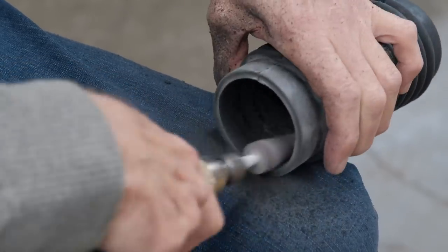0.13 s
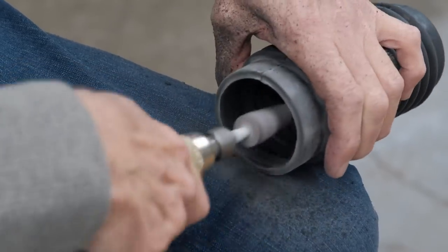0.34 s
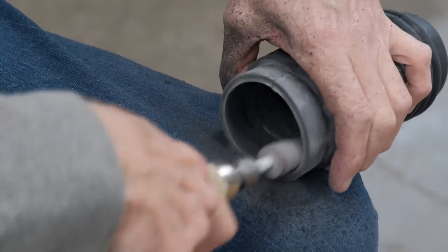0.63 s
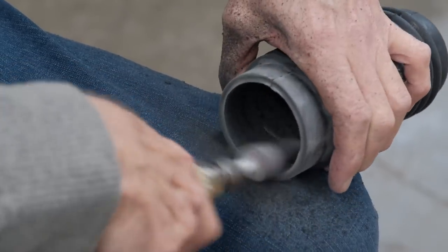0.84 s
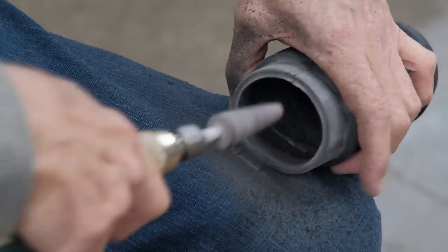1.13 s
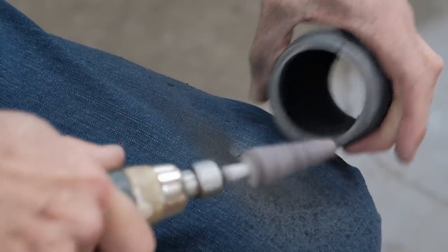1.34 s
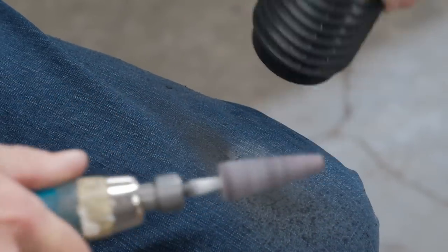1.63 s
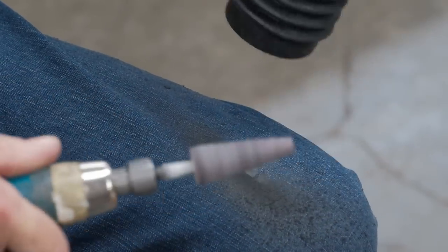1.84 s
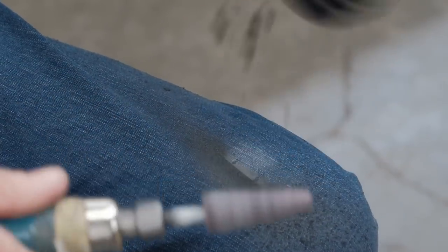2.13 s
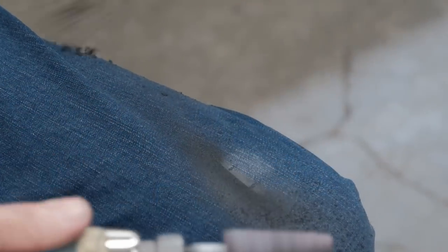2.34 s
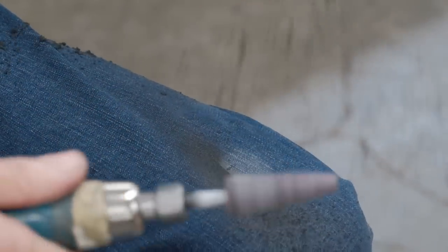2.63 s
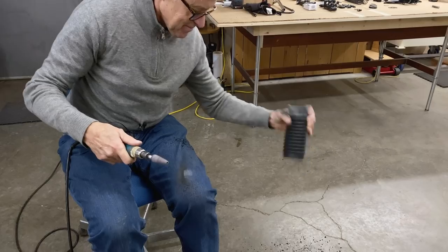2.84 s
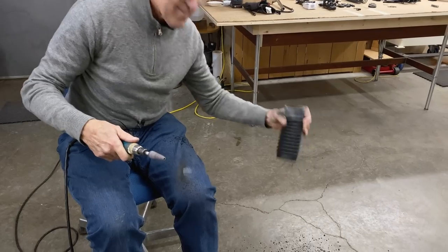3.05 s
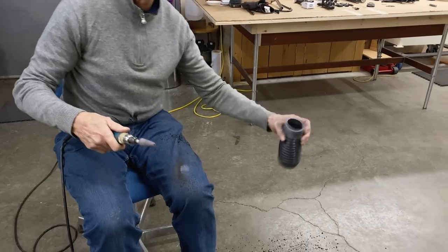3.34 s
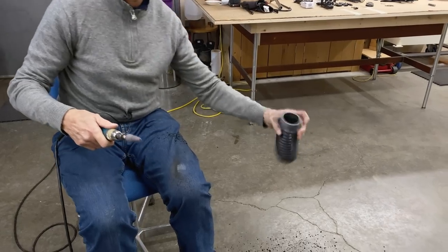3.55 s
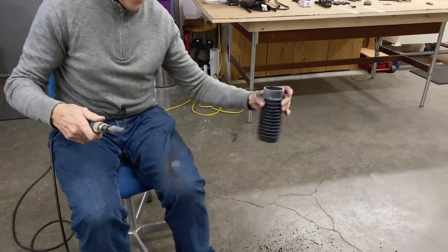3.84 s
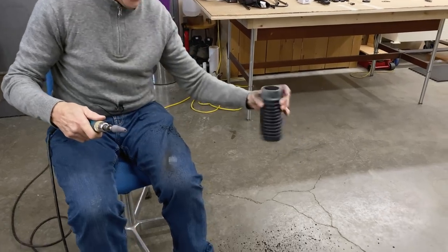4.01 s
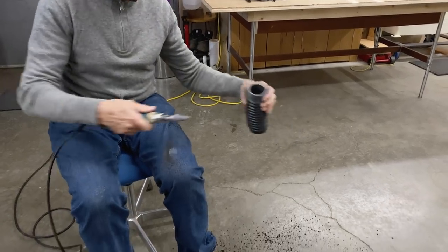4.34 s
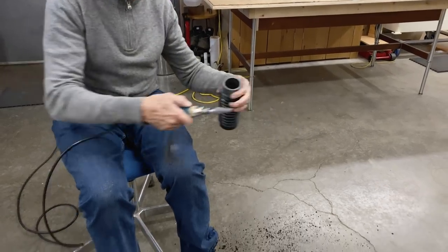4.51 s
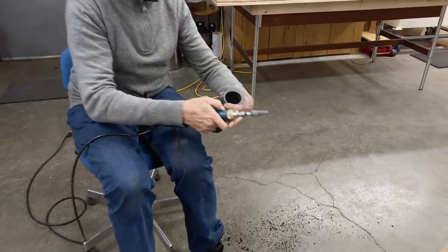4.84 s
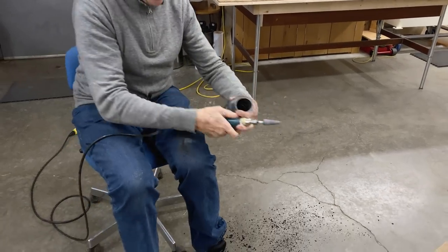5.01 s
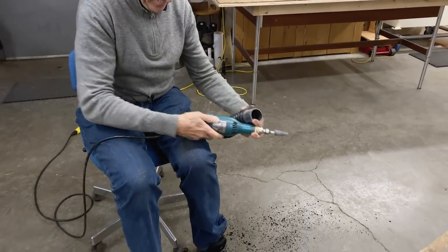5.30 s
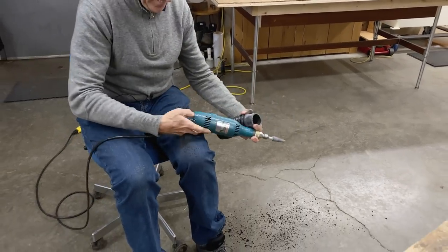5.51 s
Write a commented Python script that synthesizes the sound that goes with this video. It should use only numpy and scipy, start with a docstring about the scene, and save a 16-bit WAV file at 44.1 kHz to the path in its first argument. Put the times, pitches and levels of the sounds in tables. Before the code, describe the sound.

An electric die grinder whines and roars, its pitch wobbling as it sands inside a rubber hose, then spins up freely and runs at full speed.

```python
"""An electric die grinder first sands the inside of a rubber hose, its speed sagging at each bite until 1.1 s.
Pulled out, it spins up freely; from 2.75 s it runs at full speed and is swung in, raised and tipped away.
Throughout, shaft, armature and ball bearing sing as sines locked to the rotation, with a faint workshop echo,
over the cooling fan's roar, which is noise shaped in short-time spectra. All change as the hand turns the tool.
Short cross-fades join the three stretches; both channels match but for noise in set bands and moments."""
import sys
import numpy as np
from scipy import signal
from scipy.io import wavfile
from scipy.ndimage import uniform_filter1d

SR = 44100
rng = np.random.default_rng(int(sys.argv[2]) if len(sys.argv) > 2 else 0)


def inscribe(sig):
    """Save sig as 16-bit PCM at rate SR to the path in sys.argv[1].

    A 1-D sig is mono; a 2-D sig holds one channel per row.
    Samples are clipped to [-1, 1] before scaling.
    """
    pcm = np.round(np.clip(np.atleast_2d(sig).T, -1, 1) * 32767)
    wavfile.write(sys.argv[1], SR, pcm.astype(np.int16))


N = 250029
T = np.arange(N) / SR
JOINS_S, FADE_S = (1.118, 2.752), (.008, .0025)  # where the three stretches meet, and their cross-fades

# orders are multiples of the shaft speed
BALL = 2.5747  # ball passes a turn
UNBALANCE, ARMATURE, THIRD, FIFTH, EIGHTH, SLOTS = 1, 2, 3, 5, 8, 12
BARS, LOAD_DB = 24, 4  # commutator bars a turn; gain of their whine at full pressure, as motor current grows
HUM_ORDERS = (UNBALANCE, ARMATURE, BALL)  # the three strongest lines
# orders of the upper lines, which change as the vents face the microphone or turn away
LOUD_ORDERS = (3, BALL + 1, 4, 2 * BALL - 1, BALL + 2, 5, 6, 2 * BALL + 1, 7, 3 * BALL, 8, 12, 16, 24, 25)
# orders of the faint lines that come and go
FAINT_ORDERS = (BALL / 7, 4 - BALL, 2.265, 2 * BALL, BALL + 3, 2 * BALL + 2, 10, 11, 3 * BALL + 4, 13, 15,
                19, 21, 23, 26, 27, 28, 29, 31, 35)
FLUTTER_DB = (.4, .6)  # rms tremble of a line without pressure, and that added at full pressure
SLIPS = (.25, .75)  # turns by which the second and third stretch are out of step with the first
# pressure of the sanding cone on the rubber: t/s, pressure (0-1)
PRESSURE = [(0, 1.), (1.09, 1.), (1.13, 0.05), (5.67, 0.14)]
# brief flares and dropouts of single lines: t/s, Gaussian half length/s, order, lift/dB
FLARES = [(0.275, .014, UNBALANCE, -6), (.33, 0.016, THIRD, 5), (1.095, 0.015, UNBALANCE, 7.5),
          (1.088, .02, THIRD, 4), (.03, .05, SLOTS, 5), (2.06, 0.048, EIGHTH, 2), (2.66, 0.052, SLOTS, -6),
          (2.69, 0.039, EIGHTH, -12), (3.269, 0.073, FIFTH, 10.5), (4.35, .05, SLOTS, 15.5),
          (4.36, 0.051, BALL, -14), (4.46, 0.016, ARMATURE, -1.5), (3.9, 0.024, BALL, -1),
          (4.64, .05, UNBALANCE, 0), (5.25, 0.047, FIFTH, 4.5)]


def motor():
    """Order lines: each part's tone keeps a fixed ratio to the rotation; the snatching cone adds tremble."""
    pressure, speed_hz = columns(PRESSURE, T)[0], shaft()
    jitter = (0.0002 + 0.0015 * pressure) * wander(60., T)
    turns = np.cumsum(speed_hz * (1 + jitter)) / SR
    shares = [np.clip((T - s) / fade_s + .5, 0, 1) for s, fade_s in zip(JOINS_S, FADE_S)]
    levels_db = hum_levels(speed_hz, shares[0]) + whine_levels() + faint_levels(pressure, shares[1])
    out = np.zeros(N)
    for order, db in zip(HUM_ORDERS + LOUD_ORDERS + FAINT_ORDERS, levels_db):
        for s, half_s, flared_order, lift_db in FLARES:
            if flared_order == order:
                db = db + lift_db * np.exp(-.5 * ((T - s) / half_s) ** 2)
        flutter_db = (FLUTTER_DB[0] + FLUTTER_DB[1] * pressure) * wander(50., T)
        load_db = (order == BARS) * LOAD_DB * pressure
        start = rng.random()
        first, second, third = (np.sin(2 * np.pi * (order * (turns + slip) + start)) for slip in (0,) + SLIPS)
        line = first + shares[0] * (second - first) + shares[1] * (third - second)
        out += np.sqrt(2) * gain_of(db + flutter_db + load_db) * line  # sqrt(2): levels are rms
    return out


# the speed under load sags at each bite and recovers: t/s, shaft speed f/Hz
GRINDING = [(0.01, 378), (0.062, 375.7), (0.083, 365.5), (0.173, 385.5), (0.248, 351.0), (0.298, 367.2),
            (0.346, 360.3), (0.4, 385.1), (0.427, 386.6), (0.464, 374.6), (0.513, 388.7), (0.563, 381.3),
            (0.647, 401.5), (0.69, 385.2), (0.758, 400.8), (0.801, 388.1), (0.856, 394.4), (0.913, 383.8),
            (0.942, 395.8), (0.976, 388.4), (1.015, 396.0), (1.074, 377.5), (1.11, 382.2)]
FREED_HZ, GOAL_HZ, SPIN_UP_S = 385.85, 447.3, .93  # freed, it closes on its goal; time constant
FULL_HZ, CREEP_FROM_S = 443.4, 3.85  # full speed, and when it begins to creep up
CREEP_HZ, CREEP_POWER = 3.0, 1.5  # creep after one second, and its power of time


def shaft():
    """Rotor inertia: speed in Hz, loaded, then rising exponentially, then full, with every change rounded."""
    rising = GOAL_HZ - (GOAL_HZ - FREED_HZ) * np.exp(-(T - JOINS_S[0]) / SPIN_UP_S)
    full = FULL_HZ + CREEP_HZ * np.maximum(T - CREEP_FROM_S, 0) ** CREEP_POWER
    loaded = columns(GRINDING, T)[0]
    hz = np.select([T < JOINS_S[0], T < JOINS_S[1]], [loaded, rising], full)
    return uniform_filter1d(hz, size=800)


LOCAL_MEAN_S = 0.1


def surge(t):
    """Speed fluctuation: Hz by which the loaded speed exceeds its mean over the moments around it."""
    speed_hz = shaft()
    loaded = np.clip((JOINS_S[0] - T) / FADE_S[0], 0, 1)
    excess_hz = speed_hz - uniform_filter1d(speed_hz, round(LOCAL_MEAN_S * SR))
    return np.interp(t, T, loaded * excess_hz)


# base levels of the three strongest lines: t/s, unbalance level/dB, armature hum level/dB, ball pass level/dB
HUM = [(0, -41, -31, -42), (.2, -39, -31, -38), (.4, -42.5, -30.5, -40.5), (.75, -38, -28.5, -33),
       (1.11, -43, -30.5, -38.5), (1.14, -46, -28, -37), (1.5, -42.5, -30, -38), (1.65, -40, -25.5, -35),
       (1.91, -38, -26, -32.5), (2.25, -41, -28, -36.5), (2.48, -40.5, -27, -33.5),
       (2.745, -40.5, -29, -36), (2.76, -36.5, -26.5, -35), (3.2, -36, -27, -35.5),
       (3.36, -37, -29.5, -37.5), (3.7, -38, -30, -36.5), (4.07, -37.5, -29.5, -37.5),
       (4.27, -35.5, -27, -43), (4.5, -49, -33.5, -46.5), (4.79, -49, -31, -37), (5.04, -41, -32.5, -39.5),
       (5.13, -45.5, -31.5, -37), (5.2, -56, -35, -44), (5.3, -52.5, -42, -50), (5.67, -54, -40.5, -50)]
SURGE_DB, BRAKING_DB = (.02, 0.33, -0.04), (0.5, 0.2, -0.1)  # gain per Hz of surge, per 100 Hz/s of braking


def hum_levels(speed_hz, freed):
    """Load modulation: unbalance, armature hum and ball pass follow the surges and braking of the shaft."""
    above = surge(T)
    slowing = -uniform_filter1d(np.gradient(speed_hz) * SR / 100, size=900)
    braking = (1 - freed) * slowing
    return [db + a * above + b * braking for db, a, b in zip(columns(HUM, T), SURGE_DB, BRAKING_DB)]


# base level/dB: one column for each of LOUD_ORDERS, one row for each pose
WHINE_DB = [(-38, -58, -49, -55, -54, -54, -62, -56, -56, -57, -49.5, -54.5, -66, -58, -63),
            (-43.5, -65, -52, -57, -54, -62, -58, -50, -58, -51, -46, -48.5, -60, -57, -65),
            (-42, -56, -57, -56, -52.5, -59, -49, -49.5, -52, -50, -47.5, -44.5, -53, -52, -65),
            (-56, -48, -51, -51, -46.5, -55, -53, -41, -58, -46, -40.5, -46.5, -60, -55, -63),
            (-54, -45.5, -58, -46, -47.5, -55, -46, -42.5, -57, -52, -46, -56, -61, -64, -68),
            (-54, -51, -58, -46.5, -53, -57, -56, -47, -49, -57, -44, -47.5, -55, -55.5, -54),
            (-64, -51.5, -55.5, -47, -48.5, -53.5, -55, -48, -49, -62, -46.5, -50.5, -52, -56, -54),
            (-43, -56, -51, -48.5, -66, -46, -66, -58, -61, -61, -64, -45.5, -53, -67, -72),
            (-50, -52, -55, -48.5, -65.5, -45, -50, -54, -64, -53, -69.5, -53, -59, -69, -69),
            (-52, -55, -59, -46, -62, -45.5, -59, -53, -58, -57, -71, -54, -64, -65, -74)]


def whine_levels():
    """Directivity: each upper line has its own level in each pose of the tool, and drifts by 1.5 dB rms."""
    return [db + 1.5 * wander(4., T) for db in posed(WHINE_DB, T)]


# base level/dB of each of FAINT_ORDERS, while the tool grinds and spins up
RISING_DB = (-74, -64, -47, -54, -54, -55, -50, -57, -55, -58, -56, -61, -59, -58, -69, -66, -70, -68, -74,
             -76)
# base level/dB of each of FAINT_ORDERS, at full speed
STEADY_DB = (-71, -61, -50, -55, -54, -61, -57, -57, -58, -60, -58, -54, -57, -64, -70, -62, -64, -76, -67,
             -77)
# tilt of the faint lines, negative as the vents turn away: t/s, level/dB added for every ten orders
AWAY = [(0, -.1), (1.5, -.1), (2.74, -1.5), (2.76, .1), (4.3, -.2), (4.5, -2.5), (5.67, -3.5)]


def faint_levels(pressure, at_full_speed):
    """Shadowing: faint lines follow the blade hiss, are muffled by the hose, and tilt as the vents turn."""
    facing_db = columns(HISS, T)[0] + 30 - 6.5 * pressure
    away_db = columns(AWAY, T)[0]
    levels_db = []
    for order, rising_db, steady_db in zip(FAINT_ORDERS, RISING_DB, STEADY_DB):
        base_db = rising_db + at_full_speed * (steady_db - rising_db)
        sway_db = 2.5 * wander(2.565, T)
        levels_db.append(base_db + facing_db + order / 10 * away_db + sway_db)
    return levels_db


# how the tool is held: deep in the hose, at its rim, pulled out, lowered, rested, far off, arm back,
# swung in, raised, tipped away: t/s of the start, glide/s
POSES = [(0, .01), (.53, .1), (1.118, .01), (1.53, 0.24), (2.15, 0.21), (2.752, .01), (3.3, 0.23),
         (4.4, 0.32), (4.95, 0.17), (5.24, 0.19)]


def posed(rows, t):
    """Interpolation: one row for each pose becomes one curve for each column, gliding from pose to pose."""
    knots = np.ravel([(s - glide / 2, s + glide / 2) for s, glide in POSES])[1:]
    return [np.interp(t, knots, np.repeat(c, 2)[:-1]) for c in np.transpose(rows)]


# blade hiss, which scales the whole roar: t/s, relative level/dB
HISS = [(0, -32), (.5, -33), (1.1, -31.5), (1.2, -30), (1.49, -31.5), (1.88, -28.5), (2.2, -31),
        (2.65, -30.5), (3.3, -29.5), (3.7, -29.5), (4.05, -30), (4.22, -29), (4.52, -30), (4.77, -28.5),
        (4.99, -31.5), (5.12, -30), (5.4, -33), (5.67, -33)]


def fan():
    """Turbulence noise: random short-time spectra take the air's colour; set patches differ left from right."""
    frames, hz = N // 128 + 5, np.fft.rfftfreq(512, 1 / SR)[:, None]
    t = np.arange(frames) * 128 / SR
    a, b, c, d, patches = rng.standard_normal((frames, 257, 5)).T
    patches = uniform_filter1d(patches, size=7, axis=0)
    patches = evened(uniform_filter1d(patches, size=40, axis=1))
    field_db = air_colour(hz, t) + 0.93 * patches + passing_shapes(hz, t) + gusts(hz, t) + top_flicker(hz, t)
    spread = spread_share(hz, t)
    middle = np.sqrt(1 - spread) * (a + 1j * b)
    sides = np.sqrt(spread) * (c + 1j * d)
    left_right = np.array([middle + sides, middle - sides])
    noise = signal.istft(left_right * gain_of(field_db), nperseg=512, noverlap=384)[1]
    return gain_of(-23.5) * noise[:, :N]


# colour of the cooling air: f/Hz, relative level/dB per Hz
AIR = [(25, -41), (70, -54), (160, -8.5), (330, -2.5), (520, -5), (720, 8), (1000, 13), (1400, 5),
       (2000, 1.5), (3000, 4), (4200, 1), (5500, 1.5), (7500, 4), (10000, -5), (13000, -14), (15600, -24)]
# parts that beam differently (housing, intake, outlet, slots, blades, brushes): f/Hz, bell width/octaves
PARTS = [(300, 0.87), (1000, 1), (2000, 0.65), (3100, 0.25), (4600, 0.31), (12500, 0.55)]
# lift/dB: one column for each of PARTS, one row for each pose
LIFTS_DB = [(0, 1.1, -2.5, 3, -1.5, 2), (-1, 2, -3, 3, -0.9, 1.8), (-1.5, -1, -1, 3.5, -3, 1.5),
            (-1.5, -1, 0.5, 2, -1.5, 1.5), (-1.5, 0, 1, -1.5, -1, 3), (-2.5, 2, -4, 3.5, -1, 2),
            (-2, -3, 0, -1, -1.1, 1), (2.5, -5.5, 3.5, -2.5, -1, -2.5), (3, -4.5, 6, -2, 1, 1),
            (-2.5, -7.5, 6.5, -1, -1.5, -1.5)]


def air_colour(hz, t):
    """Directivity of broadband sources: the air's spectrum plus the bell of each part, lifted by pose."""
    field_db = read(AIR, hz) + columns(HISS, t)[0]
    for (centre_hz, octaves), lift_db in zip(PARTS, posed(LIFTS_DB, t)):
        field_db += bump(hz, centre_hz, octaves) * lift_db
    return field_db


# swells and dips as a vent sweeps past, and a brief broad dip at 1.1 s: t/s, Gaussian half length/s, f/Hz, bell
# width/octaves, lift/dB
SWELLS = [(.45, 0.06, 3700, .1, -2), (.9, 0.077, 2000, .15, -4), (1.1, .012, 4300, .6, -3),
          (1.17, .04, 3020, 0.28, 3.5), (1.2, 0.1, 7700, .15, 2), (1.797, 0.082, 1450, .2, 3),
          (1.95, 0.39, 6200, 0.048, 5), (2.425, 0.071, 1530, 0.33, 2.5), (2.445, 0.14, 4430, .08, 7.5),
          (2.858, 0.065, 2020, 0.17, -4), (3.55, .1, 1980, 0.063, 8), (4.213, 0.069, 5950, .15, 6.5),
          (4.25, .06, 3200, 0.24, 2.5), (4.32, 0.17, 12600, 0.13, 6), (4.55, .1, 1900, .2, -3),
          (4.7, .35, 190, .5, 2), (4.776, 0.11, 1310, 0.22, 6), (4.79, 0.065, 7600, 0.19, 4),
          (4.952, 0.033, 3000, .2, -3), (5.452, .18, 3130, 0.083, 8)]
# a hollow sliding up as the arm swings in, like a floor echo cancelling: t/s, f/Hz, lift/dB
HOLLOW = [(4.22, 1690, -7), (4.3, 1900, -10), (4.45, 2620, -6), (4.6, 3100, -10), (4.75, 3280, -4.5)]
# a crest sliding through the roar as the tool tips over: t/s, f/Hz, lift/dB
CREST = [(5.0, 2300, 0.1), (5.06, 2450, 5), (5.12, 2850, 5), (5.19, 3200, 6), (5.3, 3150, 3.5),
         (5.4, 3100, 1), (5.67, 3100, 2)]


def passing_shapes(hz, t):
    """Time-varying filtering: brief swells, a sliding hollow and a sliding crest, in dB."""
    shape_db = 0
    for s, half_s, centre_hz, octaves, lift_db in SWELLS:
        shape_db = shape_db + bump(hz, centre_hz, octaves) * lift_db * np.exp(-.5 * ((t - s) / half_s) ** 2)
    for rows, octaves in ((HOLLOW, .1), (CREST, .13)):
        centre_hz, lift_db = columns(rows, t)
        shape_db += bump(hz, centre_hz, octaves) * lift_db
    return shape_db


def gusts(hz, t):
    """Amplitude modulation: the air follows speed surges and wavers at random, in dB."""
    surge_db = read([(1500, .01), (6000, .05), (13000, .12)], hz) * surge(t)
    treble_db = read([(6000, 0.11), (13000, 0.94)], hz) * wander(12., t, step=1)
    quick_db = read([(800, 0.56), (3000, 0.77), (12000, 0.31)], hz) * wander(60., t, step=1)
    return surge_db + treble_db + quick_db


def top_flicker(hz, t):
    """Periodic modulation: a steady 47.5 Hz flicker is laid over the topmost hiss, in dB."""
    return read([(5000, .1), (8000, 0.54), (13000, 1.8)], hz) * np.sin(2 * np.pi * 47.5 * t)


# set bands and moments where noise differs left from right: from t/s, to t/s, low f/Hz, high f/Hz, share (0-1)
SPREADS = [(0, .12, 3400, 4600, 0.4), (0.1, 0.327, 3500, 5160, 0.74), (0.3, 0.41, 3500, 4520, 0.8),
           (0.356, 0.544, 3230, 4260, 0.56), (1.086, 1.12, 300, 15700, 0.6)]


def spread_share(hz, t):
    """Decorrelation: the share of noise power, by band and moment, that is opposite in the two channels."""
    spread = np.zeros((len(hz), len(t)))
    for start, end, low_hz, high_hz, share in SPREADS:
        inside = (t > start) * (t < end) * (hz > low_hz) * (hz < high_hz)
        spread = np.maximum(spread, np.clip(share, 0, 1) * inside)
    return spread


# decay of the workshop: f/Hz, time to fall by 60 dB t/s
SHOP = [(200, 0.55), (1000, 0.37), (4000, 0.5), (12000, 0.077)]


def shop(x):
    """Reverberation: sparse taps of random sign, each band decaying exponentially at its own rate."""
    taps = np.zeros(SR)
    at = np.arange(400, SR - 22, 22)
    taps[at + rng.integers(0, 22, at.shape)] = rng.choice([-1., 1.], at.shape)
    hz, t, z = signal.stft(taps, SR, nperseg=256)
    t60_s = np.maximum(read(SHOP, hz), .05)[:, None]
    tail = signal.istft(z * gain_of(-60 * t / t60_s), SR, nperseg=256)[1]
    return signal.fftconvolve(x, tail / np.linalg.norm(tail))[:N]


def gain_of(db):
    """Logarithmic level: decibels to an amplitude factor."""
    return 10 ** (np.asarray(db) / 20)


def evened(x):
    """Normalization: scales to rms 1."""
    return x / np.sqrt(np.mean(x ** 2) + 1e-20)


def read(points, hz):
    """Interpolation: reads a spectrum on a log-frequency axis."""
    f, value = np.transpose(points)
    return np.interp(np.log(hz + 1), np.log(f + 1), value)


def columns(rows, t):
    """Interpolation: reads every column of a curve table at the times t."""
    s, *rest = np.transpose(rows)
    return [np.interp(t, s, c) for c in rest]


def wander(top_hz, t, count=24, step=64):
    """Superposition: sines of random phase up to top_hz make slow chance of rms 1."""
    hz = np.geomspace(top_hz / 16, top_hz, count)[:, None]
    coarse = t[::step]
    sines = np.sin(2 * np.pi * (hz * coarse + rng.random((count, 1))))
    wave = (sines / np.sqrt(hz)).sum(0)
    return np.interp(t, coarse, evened(wave))


def bump(hz, centre_hz, octaves):
    """Resonance shape: a Gaussian bell of height 1 on a log-frequency axis."""
    return np.exp(-.5 * (np.log2((hz + 1) / centre_hz) / octaves) ** 2)


def scene():
    """Superposition: motor lines with the shop's echo of them at -22 dB, over the fan."""
    lines = motor()
    return lines + gain_of(-22) * shop(lines) + fan()


def record(dry):
    """Band limiting: the microphone cuts the deep bass, then a steep filter ends the treble at 15.7 kHz."""
    thin = signal.sosfilt(signal.butter(1, 120., "high", fs=SR, output="sos"), dry)
    treble_limit = signal.firwin(1023, 15720, window=("kaiser", 11), fs=SR)
    return signal.oaconvolve(thin, treble_limit[None], "same")


dry = scene()
out = record(dry)
inscribe(out)
```